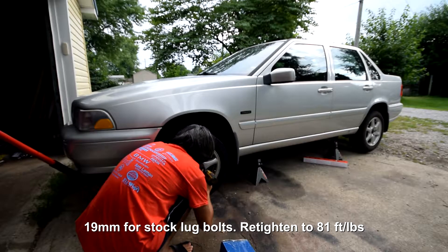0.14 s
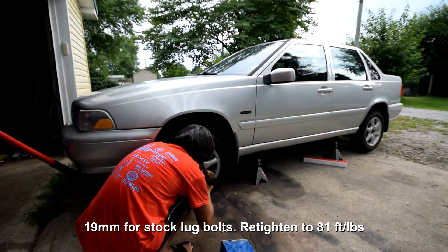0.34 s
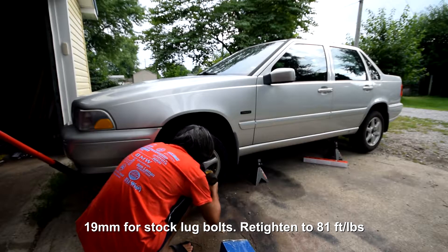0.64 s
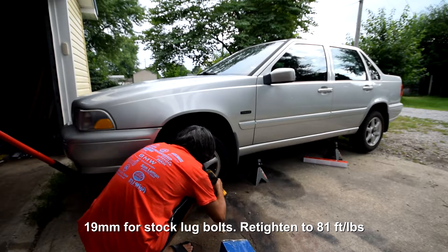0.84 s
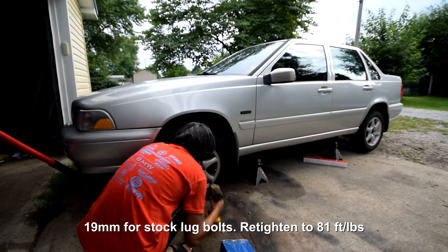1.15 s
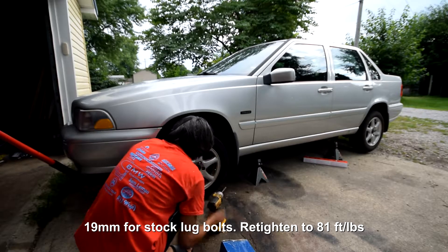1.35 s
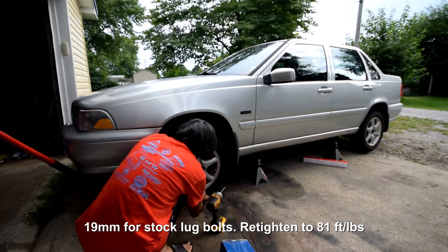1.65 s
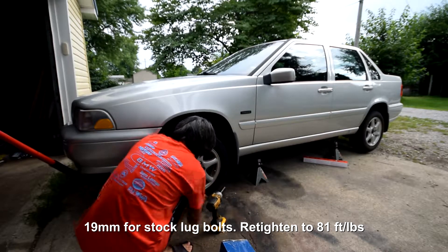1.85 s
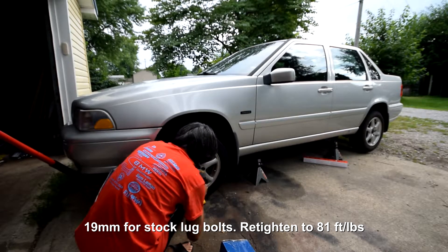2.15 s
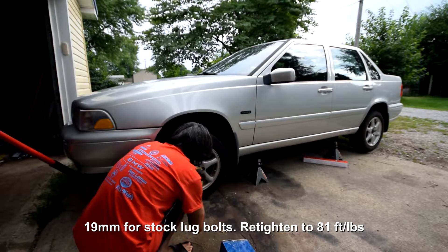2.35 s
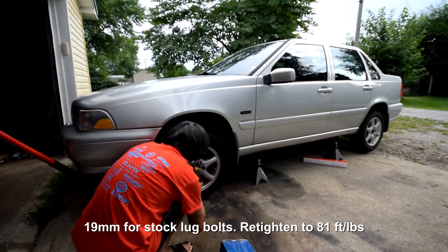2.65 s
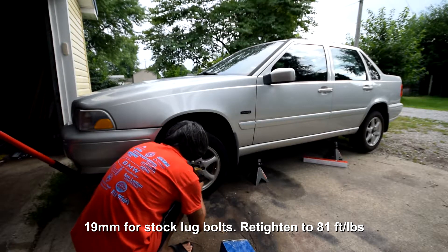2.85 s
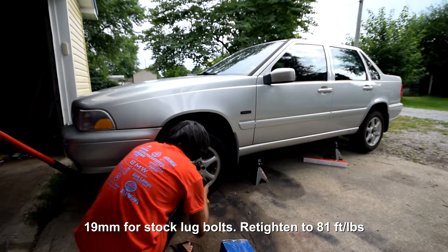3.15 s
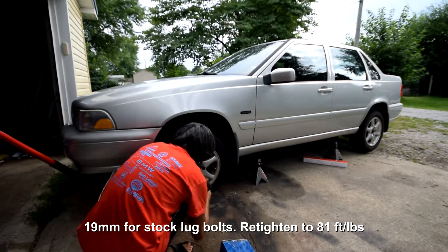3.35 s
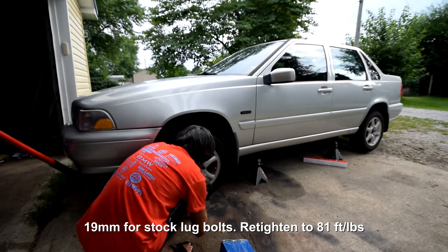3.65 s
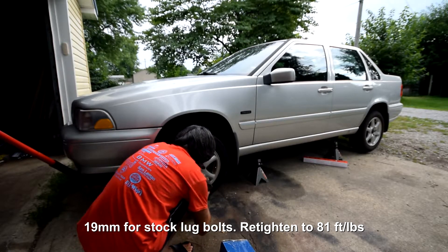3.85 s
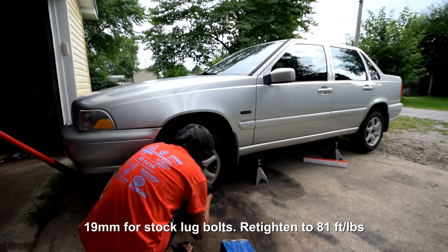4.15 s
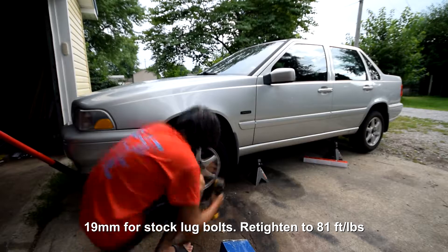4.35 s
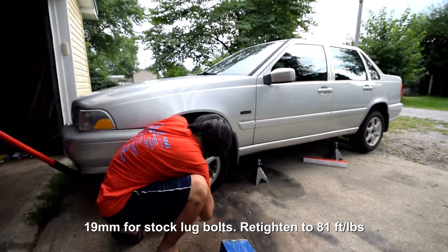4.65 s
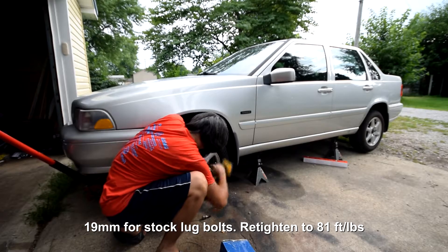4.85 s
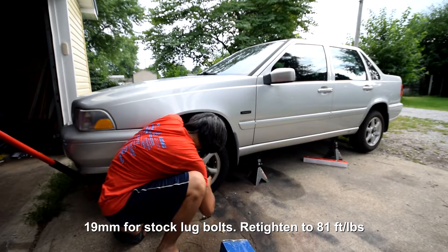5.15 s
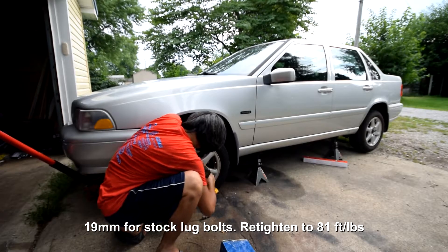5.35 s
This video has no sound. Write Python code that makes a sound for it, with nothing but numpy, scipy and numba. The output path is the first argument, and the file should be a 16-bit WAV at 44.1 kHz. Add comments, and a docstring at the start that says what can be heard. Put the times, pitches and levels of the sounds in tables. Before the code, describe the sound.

Four bursts of very fast, hard steel hammering, with gear whine that runs on and drops as each bolt frees. The first is longest, the last shortest. Between them are thin high squeaks, metal clinks, gritty scuffs and dull knocks. The microphone is near, slightly overloaded by the blows, with a short echo off car and ground and a quiet driveway behind.

```python
"""Rapid hammering, about 52 blows a second: a cordless impact wrench undoes wheel bolts in four short bursts.
Each blow is a decaying noise contact, coloured as a hard crack and fed to ringing wheel and socket modes.
Motor: coloured gear grains and whine partials that run on, then slow to a stop. Between bursts a high tone
squeaks, noise taps ring steel, noise knocks, sine thumps and gritty grains scuff.
Behind: filtered-noise air, a distant drone and an insect trill."""
import sys
import numpy as np
from scipy import signal
from scipy.fft import rfft, irfft
from scipy.io import wavfile
from scipy.ndimage import map_coordinates
from numba import njit

SR = 44100
rng = np.random.default_rng(int(sys.argv[2]) if len(sys.argv) > 2 else 0)


def generate_wav(sig):
    """Save sig (samples, or channels by samples) to the path in sys.argv[1] as 16-bit PCM at SR."""
    pcm = np.round(np.clip(np.atleast_2d(sig).T, -1, 1) * 32767).astype(np.int16)
    wavfile.write(sys.argv[1], SR, pcm)


N = 242546
TIME = np.arange(N) / SR
RING_N = 8192  # length of decays and impulse responses [samples]


def undb(db):
    """Decibels to gain."""
    return 10 ** (np.asarray(db) / 20)


def unit(x):
    """Scale to rms 1."""
    return x / np.sqrt(np.mean(x ** 2))


def add(out, start_s, x):
    """Mix x into out from start_s."""
    i = max(int(start_s * SR), 0)
    out[i:i + len(x)] += x[:max(N - i, 0)]


def fade(t60_s):
    """Exponential decay, 60 dB down after t60_s."""
    return np.exp(-np.log(1000) * TIME[:RING_N] / t60_s)


def through(x, response):
    """Pass x through an impulse response scaled to unit energy."""
    return signal.fftconvolve(x, response / np.linalg.norm(response))[:len(x)]


def colour(x, points, tilt_db=0, size=2048):
    """Minimum-phase filter with a (frequency [Hz], gain [dB]) shape, tilted in dB per octave."""
    hz, db = np.transpose(points)
    octave = np.log2(np.maximum(np.arange(size // 2 + 1), 1) * SR / size)
    tilt = tilt_db * (octave - octave.mean())
    gain = undb(np.interp(octave, np.log2(hz), db) + tilt)
    # fold the cepstrum to make the filter causal
    cepstrum = irfft(np.log(gain))
    cepstrum[1:size // 2] *= 2
    cepstrum[size // 2 + 1:] = 0
    return through(x, irfft(np.exp(rfft(cepstrum))))


def ring(modes, detune=0):
    """Impulse response: sum of decaying sine modes, each randomly detuned by a fraction."""
    response = np.zeros(RING_N)
    for hz, db, t60_s in modes:
        mode_hz = hz * (1 + detune * rng.standard_normal())
        response += undb(db) * fade(t60_s) * np.sin(2 * np.pi * mode_hz * TIME[:RING_N])
    return response


def walk(rate_hz):
    """Random values drawn at rate_hz and joined by straight lines; spread near 1."""
    steps = rng.standard_normal(N)
    return map_coordinates(steps, [TIME * rate_hz], order=1)


def gate(start, end, edge_s):
    """On from start to end, with sloping edges."""
    return np.clip(np.minimum(TIME - start, end - TIME) / edge_s + .5, 0, 1)


def swell(start, end):
    """Half-sine rise and fall from start to end."""
    return np.sin(np.pi * np.clip((TIME - start) / (end - start), 0, 1))


def tone(hz):
    """Sine of rms 1 that follows a pitch curve."""
    return np.sqrt(2) * np.sin(2 * np.pi * np.cumsum(hz) / SR)


def grains(rate_hz, spread_db):
    """Random tiny contacts of uneven size, rms 1."""
    hits = rng.random(N) < rate_hz / SR
    signs = rng.choice([-1, 1], N)
    return unit(hits * signs * undb(spread_db * rng.standard_normal(N)))


def radiate(x, corner_hz=260):
    """Small steel parts give off little bass: high-pass."""
    return signal.sosfilt(signal.butter(2, corner_hz, "high", fs=SR, output="sos"), x)


# outdoor air spectrum: (frequency [Hz], relative level [dB])
AIR_COLOUR = [(15, -66), (25, -6.5), (120, -5.5), (343, -8), (573, -17), (2980, -25.5), (4840, -25.5),
              (5250, -26), (6170, -27.5), (6880, -15), (8310, -26.5), (14700, -30.5), (15900, -33)]
# distant drone: (time [s], level [dB])
DRONE_LEVEL = [(0.0, -44.5), (0.5, -44), (1.9, -53), (2.9, -44), (5.5, -42.5)]
AIR_DB = -45.5


def yard():
    """Filtered noise: outdoor air, narrow low drone, steady insect trill with fluctuating level."""
    air = unit(colour(rng.standard_normal(N), AIR_COLOUR)) * undb(AIR_DB + walk(4.38))
    drone_colour = [(60, -18.5), (100, -6.5), (114, 0), (140, -11.5), (300, -44)]
    drone = colour(rng.standard_normal(N), drone_colour, size=16384)
    drone *= undb(np.interp(TIME, *np.transpose(DRONE_LEVEL)))
    trill_colour = [(5500, -53), (6500, -4), (6830, 29.0), (7100, -38), (7500, 10), (8000, -36), (9500, -58)]
    trill = colour(rng.standard_normal(N), trill_colour) * undb(-57 + 2 * walk(70))
    return air + drone + trill


# handling knocks: (time [s], relative level [dB], resonance [Hz])
KNOCK_EVENTS = [(3.542, -29, 2090), (4.384, -27.5, 1000), (4.458, -20.5, 900), (4.475, -30, 1800),
                (4.5, -41, 1200), (4.5088, -17, 1780), (4.628, -24, 1090), (4.774, -34.5, 1490),
                (5.02, -25, 800), (5.075, -34, 2000)]
# knock and scuff spectrum: (frequency [Hz], relative level [dB])
KNOCK_COLOUR = [(88, -35), (150, 7.5), (449, -3.5), (713, 0), (1150, -7), (1830, -1), (4240, -16),
                (4610, -16), (9000, -25), (11700, -41), (19800, -120)]
KNOCK_T60_S = 0.029


def knocks():
    """Decaying noise, coloured broadly, plus one short resonance per knock."""
    out = np.zeros(N)
    for time_s, db, hz in KNOCK_EVENTS:
        thud = undb(db) * fade(KNOCK_T60_S) * rng.standard_normal(RING_N)
        tilt_db = 3 * np.log2(hz / 1000)  # small parts sound brighter all over
        body = colour(thud, KNOCK_COLOUR, tilt_db)
        resonance = radiate(through(thud, ring([(hz, 0, .0045)])))
        add(out, time_s, undb(-3.5) * body + undb(3.5) * resonance)
    return out


# shoe and tool scuffs: (start [s], end [s], relative level [dB])
SCUFF_SPANS = [(1.933, 2.155, -53.5), (2.225, 2.482, -47), (3.505, 3.603, -29.5), (3.653, 3.73, -32),
               (4.35, 4.582, -39), (4.58, 4.84, -45.5), (4.998, 5.054, -34), (5.063, 5.102, -34),
               (1.282, 1.35, -45)]


def scuffs():
    """Uneven gritty contacts under swelling pressure; rubbed steel rings a little."""
    pressure = sum(undb(db) * swell(start, end) for start, end, db in SCUFF_SPANS)
    rub = pressure * undb(3.2 * walk(60)) * grains(rate_hz=1800, spread_db=7)
    grit = colour(rub, KNOCK_COLOUR, tilt_db=5.0)
    ringing = colour(through(rub, ring(STEEL_MODES)), KNOCK_COLOUR)
    return grit + undb(-4) * ringing


# tool and knee meet the ground: (time [s], pitch [Hz], level [dB], t60 [s])
THUMP_EVENTS = [(1.3, 75, -34, 0.3), (1.352, 87, -31, 0.12), (5.02, 228, -23, 0.026)]


def thumps():
    """Decaying low sines."""
    out = np.zeros(N)
    for time_s, hz, db, t60_s in THUMP_EVENTS:
        add(out, time_s, undb(db) * fade(t60_s) * np.sin(2 * np.pi * hz * TIME[:RING_N]))
    return out


# bolt squeaks in its hole: (start [s], end [s], tone level [dB])
SQUEAK_SPANS = [(1.072, 1.146, -25.5), (1.216, 1.272, -40), (3.54, 3.558, -19.5), (4.38, 4.414, -48),
                (4.47, 4.528, -22)]
SQUEAK_HZ = 9895


def squeaks(rasp_db=-46):
    """Dry steel sliding on steel: faint rasp and one wavering high note that swells and dies."""
    out = np.zeros(N)
    waver = 1 + 0.00193 * walk(160)
    rasp = undb(rasp_db) * radiate(colour(rng.standard_normal(N), STRIKE_COLOUR), corner_hz=2500)
    for start, end, db in SQUEAK_SPANS:
        out += swell(start, end) * (undb(db) * tone(SQUEAK_HZ * waver) + rasp)
    return out


# loose steel clinks: (time [s], relative level [dB])
CLINK_EVENTS = [(1.109, -12.5), (1.358, -18), (1.3608, -15.5), (3.252, -36), (4.172, -13.5)]
# loose steel modes: (frequency [Hz], relative level [dB], t60 [s])
STEEL_MODES = [(1140, -3.5, 0.067), (1320, 1, 0.025), (2190, -4, 0.013), (3060, -2, 0.037),
               (3630, -6, 0.046), (4120, 0.5, 0.011), (5036, -2.5, 0.031), (6330, 2, 0.023),
               (8800, -12, 0.034)]


def clinks(tap_db=-3, ring_db=-1):
    """Bolt and socket tap each other: short noise hits, direct and through steel modes."""
    taps = np.zeros(N)
    for time_s, db in CLINK_EVENTS:
        add(taps, time_s, undb(db) * fade(.016) * rng.standard_normal(RING_N))
    direct = undb(tap_db) * colour(taps, STRIKE_COLOUR)
    ringing = undb(ring_db) * through(taps, ring(STEEL_MODES))
    return radiate(direct + ringing, corner_hz=1000)


# trigger pulls: (on [s], released [s], stopped [s], relative running level [dB], extra while braking [dB])
TRIGGER_PULLS = [(-.05, 1.072, 1.15, -29, 2), (2.428, 3.203, 3.256, -27.5, 5.5),
                 (3.685, 4.166, 4.229, -28.5, 3.5), (5.1, 5.425, 5.52, -29, 4)]
# motor and gear noise: (frequency [Hz], relative level [dB])
GEAR_COLOUR = [(59, -80), (100, -4.5), (166, 0.5), (594, -8), (1100, 3), (1250, 0), (2120, 2), (2910, -2.5),
               (4360, 2), (4950, -3.5), (10600, -7), (15900, -31)]
# rotor and tooth whine: (full-speed frequency [Hz], relative level [dB])
WHINE_PARTIALS = [(175, -15), (1270, -14), (2100, -7), (3400, -11), (4450, -11), (5500, -15), (10700, -18)]


def motor(slowdown=0.3, whine_db=-3, teeth_db=0.5, judder=0.025):
    """Gears hiss and whine; on release they get louder while the whine judders and falls."""
    level, braking = np.zeros(N), np.zeros(N)
    speed = 1 + 0.023 * walk(30) + 0.00764 * walk(600)
    for on, released, stopped, db, brake_db in TRIGGER_PULLS:
        brake = gate(released, stopped, .006)
        braking += brake
        level += undb(db + brake_db * brake) * gate(on, stopped, .01)
        progress = np.clip((TIME - released) / (stopped - released), 0, 1)
        speed *= 1 - slowdown * progress * (TIME < stopped + .1)
    speed *= 1 + judder * braking * walk(500)
    whine = sum(undb(db + 1.6 * walk(76)) * tone(hz * speed) for hz, db in WHINE_PARTIALS)
    teeth = colour(grains(rate_hz=6600, spread_db=-1.5), GEAR_COLOUR)
    return level * (undb(teeth_db) * teeth + undb(whine_db) * whine)


# late catches, where the hammer slips over the anvil and the beat restarts: time [s]
CATCH_TIMES = [0.0477, 0.1139, 0.4828, 0.5695, 0.6368, 0.7234, 0.789, 0.8579, 0.943, 2.5128, 2.6636, 3.0353,
               3.8542, 3.9392, 5.1406]
BLOW_HZ, SLIP_GAP_S = 52, 0.0265


def beat(first, last):
    """Blow times [s] on one bolt: near-even beat, longer gap before each late catch."""
    catches = [s for s in CATCH_TIMES if first < s < last]
    run_starts = [first] + catches
    run_ends = [s - SLIP_GAP_S for s in catches] + [last]
    times = []
    for a, b in zip(run_starts, run_ends):
        times.extend(np.linspace(a, b, 1 + round(abs(b - a) * BLOW_HZ)))
    return times


# socket, wheel and anvil modes: (frequency [Hz], relative level [dB], t60 [s])
WHEEL_MODES = [(406.6, -11.5, 0.23), (573, -0.5, 0.088), (737, -1, 0.035), (1309, -14, 0.054),
               (1780, -22, 0.055), (2277, 12.5, 0.0097), (2880, -5, 0.016), (3390, 2, 0.077),
               (4610, 18, 0.0073), (5580, 7, 0.037), (6250, -0.5, 0.056), (7800, -3, 0.078)]


def wheel(force):
    """Socket and wheel ring; each new bolt or slip reseats the socket and shifts the modes."""
    out = np.zeros(N)
    starts = sorted([first for first, *_ in BOLT_BURSTS] + list(CATCH_TIMES))
    for start, end in zip(starts, starts[1:] + [TIME[-1]]):
        piece = np.pad(force[int(start * SR):int(end * SR)], (0, RING_N))  # room for the tail
        add(out, start, through(piece, ring(WHEEL_MODES, detune=0.01)))
    return out


# hammering, one burst per bolt: (first blow [s], last blow [s], relative level [dB],
# tight grip [dB], grip at last blow before the FREE_DB floor [dB])
BOLT_BURSTS = [(0.0022, 0.9956, -5, -2, -26), (2.4283, 3.0928, -3.5, -2, -7.5),
               (3.6939, 4.09, -3.5, 0.5, -6), (5.1137, 5.347, -3, -2, -10.5)]
LOOSEN_S, FREE_DB = 0.063, -14  # loosening time constant, grip floor


def bolt_grip():
    """Gain of the bolt's resistance: gives way ever faster towards the last blow, then turns free."""
    db = np.full(N, float(FREE_DB))
    for first, last, _, tight_db, last_db in BOLT_BURSTS:
        giving = (last_db - tight_db) * np.exp(np.minimum((TIME - last) / LOOSEN_S, 2))
        db = np.where(TIME >= first, np.maximum(tight_db + giving, FREE_DB), db)
    return undb(db)


# blows thrown by the braking rotor: (time [s], relative level [dB])
BRAKING_BLOWS = [(1.0992, -9), (5.4792, -8.5)]
# blow spectrum: (frequency [Hz], relative level [dB])
STRIKE_COLOUR = [(30, -95), (110, -29), (280, -16.5), (410, -5), (540, -5), (700, 4.5), (900, -5),
                 (1250, -5), (2150, -1.5), (3500, -2.5), (5000, -3.5), (8000, -2), (10800, -10.5),
                 (13000, -20), (14700, -20)]
BLOW_SCATTER_DB = 0.8


def hammer(contact_s=0.0044, chatter_db=-14, chatter_t60_s=0.045, grind_db=-13.5, rebound_db=-13):
    """Brief hard contacts; the socket rebounds and chatters, and the cam grinds as it winds up again."""
    blows, chatter = np.zeros(N), np.zeros(N)
    contact = np.exp(-(TIME[:400] / contact_s) ** 2)
    hammering = [(s, db) for first, last, db, *_ in BOLT_BURSTS for s in beat(first, last)]
    for time_s, db in hammering + list(BRAKING_BLOWS):
        size = undb(db + BLOW_SCATTER_DB * rng.standard_normal())
        add(blows, time_s, size * contact)
        add(chatter, time_s, size * undb(chatter_db) * fade(chatter_t60_s))
        rebound_s = time_s + rng.uniform(.003, .012)
        rebound = undb(rebound_db + 2.5 * rng.standard_normal()) * contact
        add(chatter, rebound_s, size * rebound)
    winding = sum(gate(first - .005, last + .015, .006) for first, last, *_ in BOLT_BURSTS)
    grip = bolt_grip()
    impact = (blows + grip * chatter) * grains(rate_hz=30000, spread_db=-1.5)
    grind = undb(grind_db) * grip * winding * grains(rate_hz=4000, spread_db=-1.5)
    force = impact + grind
    crack = colour(force, STRIKE_COLOUR)
    low = signal.sosfiltfilt(signal.butter(2, 1500, fs=SR, output="sos"), crack)
    # a freed bolt no longer drives the wheel: thin blows
    seated = np.minimum(grip, 1) ** .5
    body = seated * crack + (1 - seated) * (crack - low)
    return undb(-0.5) * body + undb(-8.0) * radiate(wheel(seated * force))


def surroundings(x, echo_db=-11, t60_s=0.046, delay_s=0.00293):
    """Ground, wheel arch and car body throw back a short dense echo: decaying coloured noise."""
    response = rng.standard_normal(RING_N) * fade(t60_s) * (TIME[:RING_N] > delay_s)
    response = colour(response, [(100, -8.0), (700, 10.0), (3000, 12.0), (8000, -7), (15000, 13)])
    return x + undb(echo_db) * through(x, response)


def scene():
    """Wrench and handling with the echo beside the car; squeaks and yard without it."""
    wrench = hammer() + motor()
    handling = clinks() + knocks() + scuffs() + thumps()
    return (surroundings(wrench + handling) + squeaks() + yard())[None]


@njit
def follow(x, attack, release):
    """Level follower: fast rise, slow fall, as fractions per sample."""
    out, level = np.empty(len(x)), 0.
    for i in range(len(x)):
        size = abs(x[i])
        level += (size - level) * (attack if size > level else release)
        out[i] = level
    return out


TOP_HZ = 15900


def record(dry, threshold_db=-7, attack_s=0.0012, release_s=0.04):
    """Look-ahead limiter, then rounded peaks and a steep low-pass."""
    level = follow(dry[0], 1 / (attack_s * SR), 1 / (release_s * SR))
    ahead = np.interp(TIME + attack_s, TIME, level)
    held = dry / np.maximum(ahead / undb(threshold_db), 1)
    rounded = held / (1 + held ** 8) ** (1 / 8)
    return signal.sosfilt(signal.ellip(10, .2, 70, TOP_HZ, fs=SR, output="sos"), rounded)


dry = scene()
out = record(dry)
generate_wav(out)
```